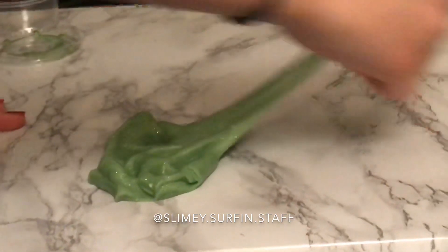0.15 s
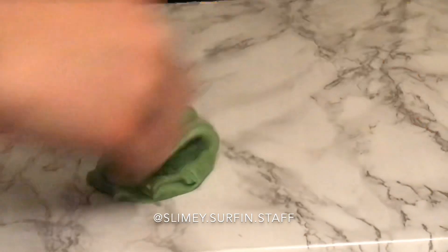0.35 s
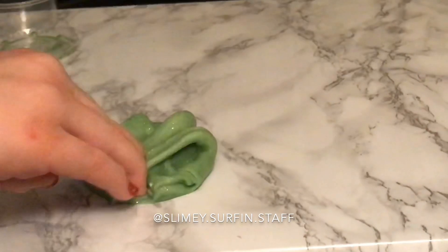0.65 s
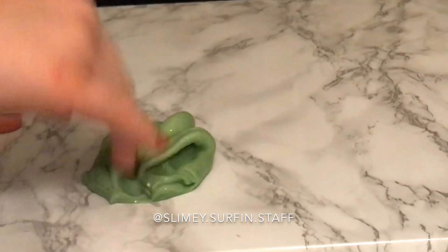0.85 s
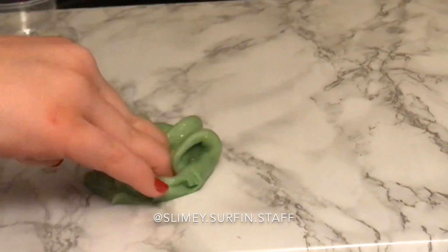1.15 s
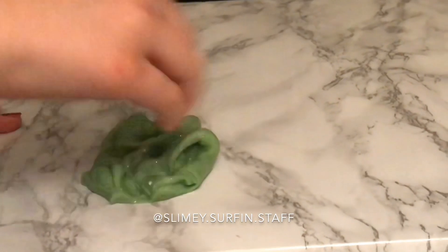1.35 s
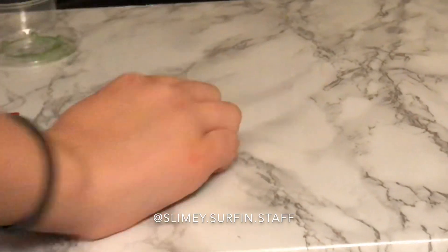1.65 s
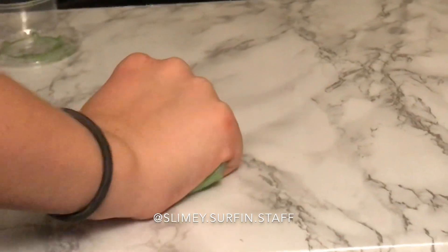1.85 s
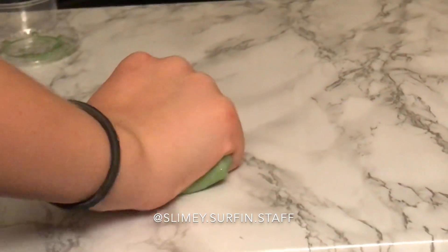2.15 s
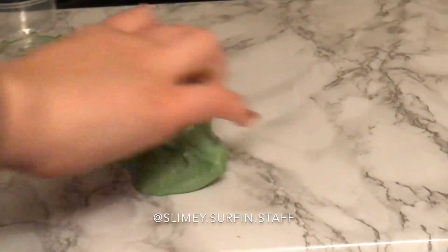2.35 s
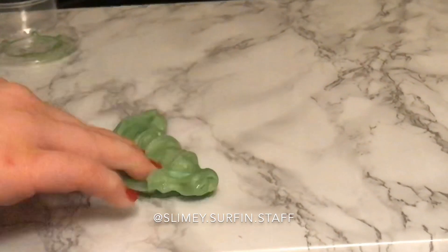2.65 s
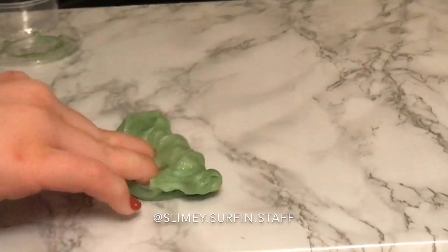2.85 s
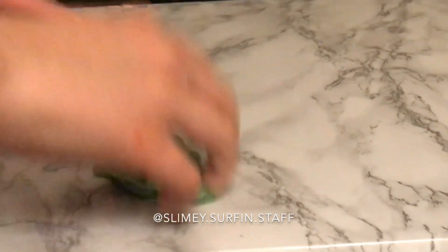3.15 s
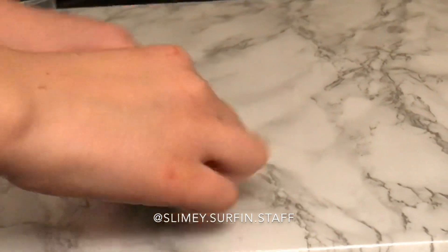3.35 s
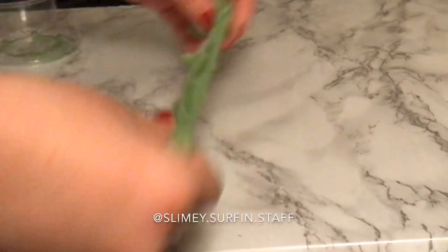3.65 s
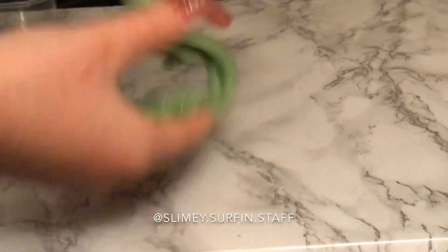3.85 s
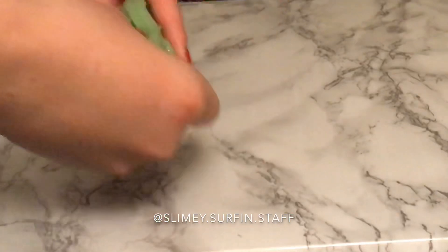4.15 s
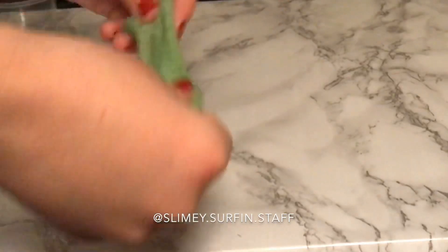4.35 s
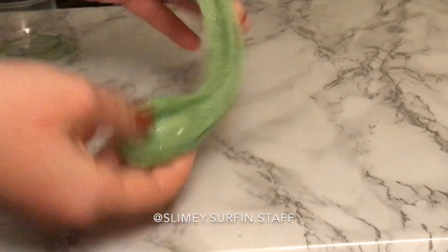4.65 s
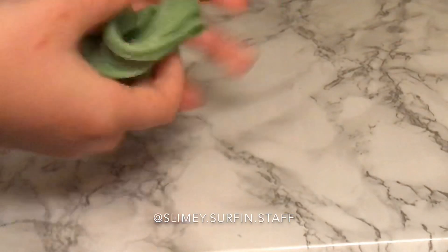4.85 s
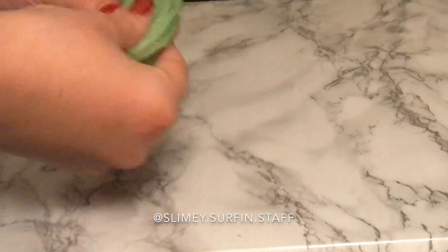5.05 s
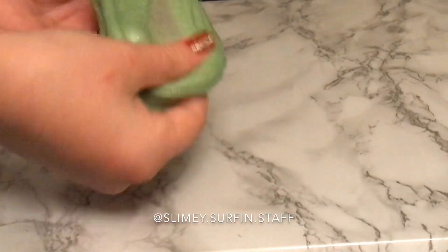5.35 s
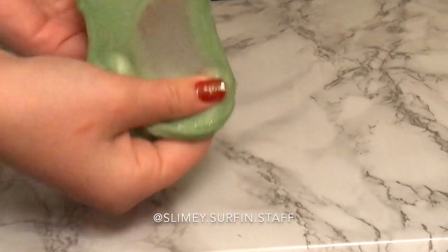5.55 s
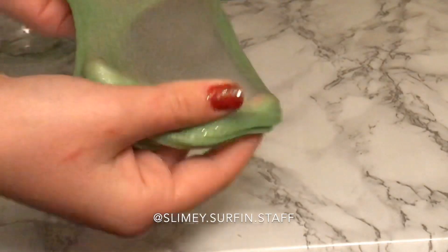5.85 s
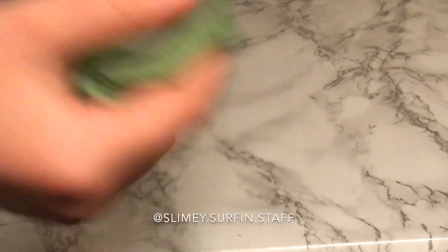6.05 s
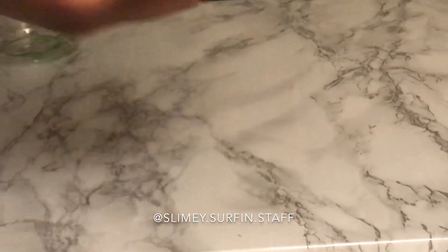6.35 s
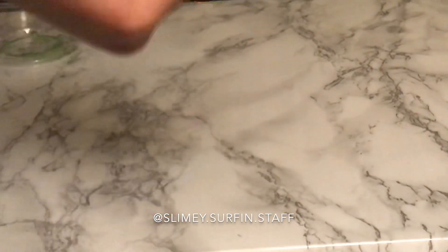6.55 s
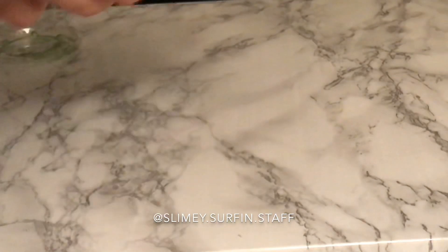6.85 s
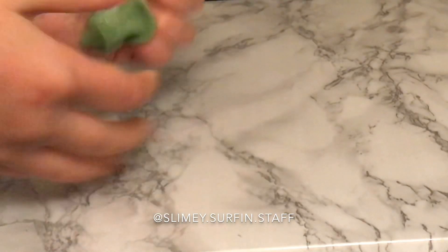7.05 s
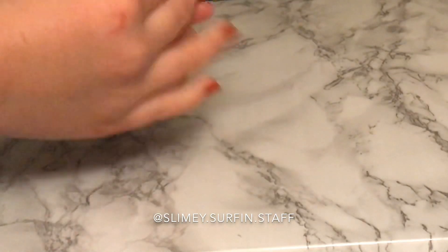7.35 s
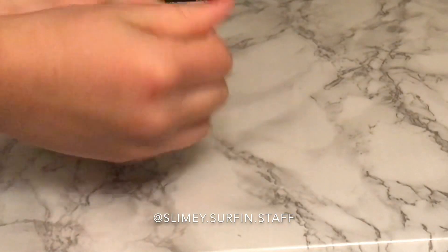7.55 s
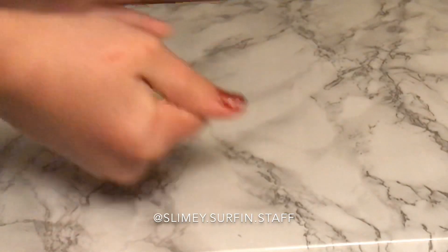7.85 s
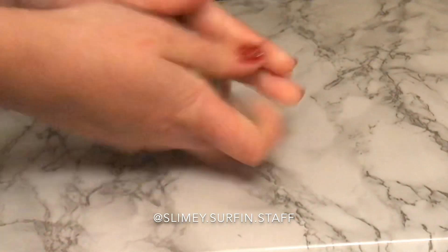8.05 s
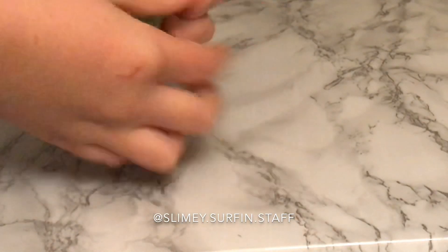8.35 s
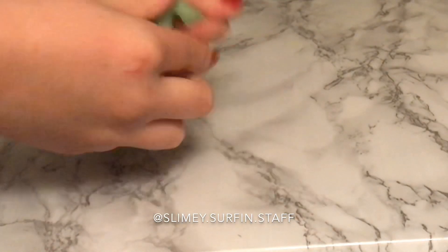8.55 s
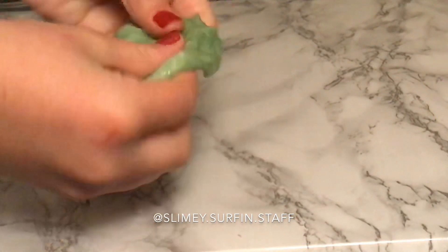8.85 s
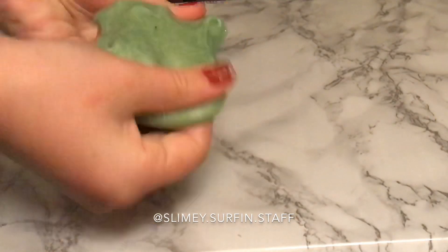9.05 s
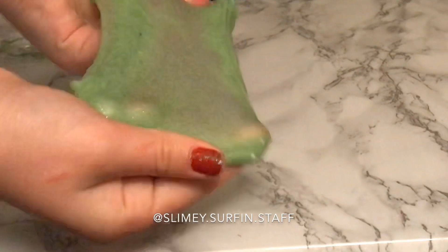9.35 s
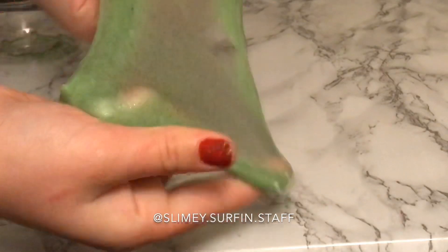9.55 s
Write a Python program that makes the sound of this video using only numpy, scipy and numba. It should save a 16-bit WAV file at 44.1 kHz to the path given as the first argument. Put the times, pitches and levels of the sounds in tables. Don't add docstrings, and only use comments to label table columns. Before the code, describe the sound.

A close microphone in a small quiet room, with faint building rumble and soft hiss throughout. Hands work sticky slime on a stone counter. The first second is nearly quiet, with small sticky ticks and a plop around 0.7-0.9 s. A crisp loud pop snaps at 1.4 s, then irregular crackles, tiny pops and soft thuds run from 1.6 to 2.4 s, ending in a wet gurgle. After a pause, snaps resume at 3.1 s; a firm knuckle press thuds at 3.3 s amid squelchy crackle until 3.5 s. Sparse stretching follows, with single pops at 4.2 and 5.4 s. Fine bright snaps gather at 6.4 and 6.85 s. The loudest sharp pops burst around 7.2-7.3 s, followed by scattered crackling to 8 s, a dull thud at 8.2 s, hollow plops and a tiny squeak near 8.5 s, ticks to 8.8 s, then near quiet.

```python
import sys
import numpy as np
from scipy import signal
from scipy.fft import rfft, irfft, next_fast_len
from scipy.io import wavfile
from scipy.ndimage import uniform_filter1d
from numba import njit

SR = 44100
rng = np.random.default_rng(int(sys.argv[2]) if len(sys.argv) > 2 else 0)


def nominal_scale(level):
    x = np.asarray(level, float) / 20
    return 10 ** x


def log_audio(samples):
    frames = np.atleast_2d(samples).T
    limited = np.clip(frames, -1, 1)
    pcm = np.round(limited * 32767).astype(np.int16)
    wavfile.write(sys.argv[1], SR, pcm)


N = 427329

# (frequency [Hz], level per Hz [dB])
CRACKLE_COLOUR = [(1500, -21), (2800, -3), (4500, 0), (6200, -0.5), (10400, -0.5), (12500, 4), (15900, 2.5)]
HOLLOW_HZ = 1600


def pops():
    bounce_s, bounce_db = 0.00016, -17.5
    out, t = np.zeros(N), np.arange(400) / SR
    bursts = pockets()
    chance = rng.random((len(bursts), 4))
    shape = (len(bursts), len(t))
    tears = rng.standard_normal(shape) * nominal_scale(4.43 * rng.standard_normal(shape))
    for (s, db, snap_hz, cavity_db, cavity_hz, tick_db), c, tear in zip(bursts, chance, tears):
        snap = ring(snap_hz, 0.47, 0, t) + 0.25 * ring(snap_hz * (0.65 + 0.13 * c[0]), 0.3, 0, t)
        snap = snap + nominal_scale(bounce_db) * np.roll(snap, round(bounce_s * SR))
        cavity = hollow(0.8 * cavity_hz, t)
        tick = ring(11500 + 1500 * c[1], 0.47, 0, t) - 0.2 * ring(14200 + 1200 * c[2], 0.28, 0, t)
        skin = snap + nominal_scale(tick_db) * tick
        tear = nominal_scale(-22.5) * tear * np.exp(-t * snap_hz / 9.5) * (t > 0.0002)
        torn_skin = np.convolve(skin, tear)[:len(t)]
        add(out, s, nominal_scale(db) * (nominal_scale(cavity_db) * cavity - skin - torn_skin))
    return signal.sosfilt(signal.butter(3, 500, "high", fs=SR, output="sos"), out)


def pockets():
    # (time [s], snap level [dB], snap pitch [Hz], hollow re snap [dB], film tick re snap
    # [dB])
    blisters = [(1.6741, -30, 8000, -28, 2), (1.3666, -14.5, 7970, -19.5, -21),
                (1.6713, -27.5, 9400, -26, 4.5), (1.6888, -35, 5670, -35, 1),
                (1.8576, -25, 6600, -26, 2.5), (1.9884, -37.5, 6000, -13, 1),
                (2.0942, -25, 5760, -21, -5), (2.1149, -32.5, 8950, -34, 4),
                (2.1773, -31.5, 5300, -31, -2), (2.2878, -39, 6050, -22, -10),
                (2.3083, -27.5, 6000, -34, 2.5), (2.3293, -31, 7160, -7.5, -14),
                (3.0906, -38.5, 6440, -23, -4), (3.2905, -32, 4860, -1.5, -12),
                (3.3142, -34, 4410, -30, -7), (3.3591, -30, 4300, -6.5, -17),
                (3.3934, -32, 3700, -20, -19), (3.4332, -28, 8900, -18, -23),
                (3.4931, -36, 7150, -13, 3),
                (4.2274, -20, 6330, -17.5, -1), (5.387, -33, 6840, -7.5, 4.5),
                     (5.3952, -43, 6030, -23, 6), (7.153, -30, 8600, -12.5, -5),
                     (7.1675, -29, 6060, -31, 2.5), (7.202, -32, 8000, -33, 2),
                     (7.2027, -23.5, 5850, -11.5, -2), (7.251, -22.5, 8700, -6.5, 12),
                     (7.2579, -3.5, 7360, -12, -2.5), (7.2937, -26, 8790, -15, -10.5),
                     (7.3039, -9, 5260, -33, 2.5), (7.463, -35, 5170, -10, -14),
                     (7.6298, -30.5, 9600, -25, -6.5), (7.726, -28.5, 7900, -28, -2),
                     (7.729, -32, 6240, -22, 3.5), (7.7531, -29, 7200, -36, 1),
                     (7.8136, -19, 8850, -46, 11), (8.4937, -29, 8090, -30, 0),
                     (8.5608, -27.5, 7300, -17, 1)]
    # (time
    # [s], snap level [dB], hollow pitch [Hz], hollow re snap [dB], tick re snap [dB])
    finger_holes = [(0.9296, -33.5, 1400, 7, 5.5), (1.1436, -49, 1320, 3, -16),
                    (1.2187, -47.5, 1960, -4, -10), (1.8255, -44, 1620, -5, -2),
                    (1.9032, -47.5, 1600, 9.5, -17), (1.9806, -42, 1540, -1.5, -2),
                    (2.0948, -45, 765, 2, -5), (2.3004, -37, 2200, -17, 3), (3.3166, -41.5, 2150, -3, -14),
                    (3.345, -50, 2330, 0, -13), (3.6455, -51.5, 2130, -5.5, -11),
                    (5.175, -64, 1040, 10, -5), (5.2708, -59, 1980, 15, 7), (5.7332, -49, 2230, -4, -1),
                    (6.8229, -53, 2070, 7, 13), (6.859, -41, 1870, -5, 11), (6.9057, -35.5, 2270, -8, -3),
                    (6.9796, -52, 2430, 3, 14), (7.105, -39, 1200, -3, -10.5),
                    (7.607, -26, 1700, -17.5, -8), (8.399, -45, 1900, -12, -8),
                    (8.433, -25.5, 1720, -7, -16), (8.471, -25, 1967, -1, 3), (9.3206, -47, 1820, -3.5, 7),
                    (2.0778, -45, 1500, -9, 1), (2.3081, -47, 915, 10.5, -10), (4.2263, -47, 1000, 4, -8),
                    (4.446, -68, 2090, 11, -10), (3.434, -54, 1190, 7, -12), (7.2582, -31, 820, 1, -10),
                    (1.912, -53, 1800, 6, -10), (8.4323, -50, 935, 4, -10), (8.4716, -44.5, 900, 4.5, -10),
                    (8.561, -53.5, 960, 6, -10), (5.3874, -52.5, 960, 2.5, -10)]
    # (time [s],
    # level [dB], snap pitch [Hz])
    small_bubbles = [(0.732, -44.5, 4200), (1.926, -44, 5170), (2.6863, -42.5, 9050), (3.0854, -44, 5680),
                     (3.3738, -44, 4600), (3.4212, -39, 4560), (3.4816, -41, 4150), (3.7877, -49.5, 4440),
                     (6.364, -43.5, 4670), (6.403, -35.5, 3770), (6.623, -40.5, 8500), (6.8674, -47, 5840),
                     (7.015, -44, 4900), (7.133, -39, 4400), (7.482, -46, 5260), (7.7393, -51, 6350),
                     (7.8544, -51, 8250), (7.8966, -38, 5880), (7.941, -48.5, 7280), (7.9537, -50, 6160),
                     (7.96, -52, 6350), (8.537, -46, 8790), (8.552, -43, 6960), (8.6782, -59, 5750),
                     (8.748, -35, 5820), (8.7845, -45, 5900), (8.8043, -44, 8790), (8.8257, -45, 5600),
                     (9.123, -49, 4500), (1.8915, -40, 6500), (1.923, -41, 5240), (1.71, -47, 5600),
                     (3.441, -36, 7460), (4.338, -47, 6650), (8.791, -42, 6000), (8.569, -41, 6200),
                     (0.9345, -36, 7400), (6.8706, -39, 4800), (6.834, -47, 5520), (7.1605, -50, 7000),
                     (1.3667, -25.5, 4000), (9.014, -57, 2300), (9.171, -59, 2400), (9.226, -58.5, 2600),
                     (3.898, -57, 1900), (3.932, -60, 1600), (3.813, -53, 4700)]
    # (time [s], tick level [dB], snap re tick [dB])
    thin_threads = [(0.907, -39, -8), (6.727, -53, -13), (1.6285, -53, -8), (1.8294, -32, -8),
                    (2.056, -35, -8.5), (2.0735, -40, -16), (2.1082, -34, -30), (2.128, -29.5, -12),
                    (2.1474, -35, -23), (2.1863, -34.5, -20), (3.046, -41, -9), (3.6059, -49, -9),
                    (3.19, -58, -6), (3.932, -46.5, -4.5), (4.012, -59, -1), (1.074, -60, 8),
                    (4.3246, -38, -13), (4.5124, -47, -11), (5.7104, -43.5, -7), (6.7085, -35.5, -7.5),
                    (7.225, -22.5, -22.5), (7.863, -31.5, -10), (7.9386, -33, -15), (7.949, -51, -8),
                    (8.047, -47, -8), (8.522, -39, -5), (8.6566, -41.5, -8), (8.7633, -42, -10),
                    (0.924, -42, -10), (0.9567, -57, -8), (1.6822, -34, -12), (1.707, -40, -6),
                    (1.8373, -44, -15), (2.0865, -39, -15), (2.1008, -31, -7), (4.333, -47, -6),
                    (5.4011, -48, -10), (6.6186, -50, -7), (7.238, -35, -11.5), (7.2676, -13, -6),
                    (7.3903, -50, -10), (7.5339, -51, -10), (7.568, -43, -14), (7.7339, -35, -13),
                    (7.7394, -36, -16), (7.7481, -41, -14), (7.7667, -36, -9), (7.955, -45, -10),
                    (7.9719, -49, -10), (8.1254, -41, -2), (8.5469, -42, -10), (8.6779, -52, -10),
                    (8.7389, -37, -16)]
    # (time [s], level [dB])
    finest_threads = [
        (6.6479, -46),
        (6.8581, -25),
        (6.8676, -35),
        (6.8834, -37),
        (7.2817, -24.5),
        (6.682, -48),
        (6.2, -42),
        (7.2595, -17),
        (6.832, -34),
    ]

    rows = []
    for s, db, hz, hollow_db, tick_db in blisters:
        hollow_hz = HOLLOW_HZ * 2 ** (-0.024 * (db + 30))
        rows.append((s, db, hz, hollow_db, hollow_hz, tick_db))
    for s, db, hz, hollow_db, tick_db in finger_holes:
        rows.append((s, db, 2.4 * hz, hollow_db, hz, tick_db))
    for s, db, hz in small_bubbles:
        rows.append((s, db, hz, -20.5, HOLLOW_HZ, -3))
    for s, db in finest_threads:
        rows.append((s, db, 15100, -40, HOLLOW_HZ, -13))
    for s, db, snap_db in thin_threads:
        rows.append((s, db + snap_db, 6240, -14, HOLLOW_HZ, -snap_db))
    return rows


def ring(hz, cycles, phase, t):
    u = t * hz / cycles
    shape = u ** 1.64 * np.exp(-u) * np.sin(2 * np.pi * hz * t + phase)
    return shape / np.abs(shape).max()


def hollow(hz, t):
    cycles, sag = 0.5, 0.8
    u = t * hz / cycles
    turns = hz * t + sag * cycles * (1 - np.exp(-u))
    shape = u * np.exp(-u) * np.sin(2 * np.pi * turns)
    return shape / np.abs(shape).max()


def peel():
    # (peak
    # [s], crackle level [dB], wet squelch re crackle [dB], rise [s], fall [s])
    peels = [(0.02, -69.5, -22, 0.063, 0.26), (0.739, -64.5, 1.5, 0.03, 0.01),
             (0.908, -62, -1, .012, 0.016), (0.933, -53, 6.5, 0.01, 0.034),
             (1.372, -48.5, -1, 0.0062, 0.053), (1.679, -59, -2, 0.069, 0.036),
             (1.74, -60.5, -4.5, 0.1, 0.33), (1.909, -66, -10, 0.1, 0.089),
             (1.994, -61, -21, 0.039, 0.11), (2.102, -64, -15, 0.06, 0.11),
             (2.189, -51.5, -24, 0.018, 0.034), (2.31, -44.5, -9.5, 0.038, 0.052),
             (2.356, -53.5, -8, 0.073, 0.09), (3.055, -63, 1.5, 0.014, 0.066),
             (3.097, -55.5, -5.5, 0.026, 0.028), (3.296, -68, 12, 0.0099, 0.098),
             (3.367, -55.5, 3.5, 0.052, 0.064), (3.48, -62, -1, 0.24, 0.14),
             (3.6, -87, 9.5, 0.12, 0.94), (1.13, -68, 2, 0.026, 0.041),
             (3.8, -70.5, 0, 0.11, .07), (4.33, -69.5, -25, .004, 0.12), (4.7, -59.5, -7, 0.043, .03),
                  (4.655, -70, -3, 0.064, .03), (4.25, -58.5, -23, 0.032, 0.041),
                  (4.717, -58.5, -10, 0.023, 0.024), (4.785, -71, 0, 0.037, 0.052),
                  (5.396, -59.5, -11, 0.0048, 0.06), (6.03, -68, -7, 0.13, 0.053),
                  (6.1, -76.5, 5.5, 0.24, 0.41), (6.404, -64, -1, 0.11, 0.15), (6.83, -59, -8, 0.07, .06),
                  (6.866, -51.5, -4, 0.061, 0.069), (7.02, -66, -8, 0.32, 0.18),
                  (7.114, -63.5, 1, .02, 0.054), (7.206, -52.5, 1, 0.0091, 0.036),
                  (7.262, -43.5, -2.5, 0.014, 0.035), (7.295, -62.5, -3.5, .03, 0.31),
                  (7.42, -70, -13, .08, 0.072), (7.474, -53, -1, 0.069, 0.15),
                  (7.615, -59.5, -2, 0.058, 0.12), (7.95, -63.5, -7, 0.67, 0.97),
                  (8.13, -53, -6.5, 0.057, 0.051), (8.165, -51, -4.5, 0.056, 0.058),
                  (8.35, -75.5, 6, 0.73, 0.2), (8.482, -55.5, -7, 0.043, 0.054),
                  (8.567, -72, 1, 0.06, 0.21), (8.7, -57.5, -3.5, 0.043, 0.077),
                  (8.759, -60.5, -6, 0.13, 0.11)]
    # (frequency [Hz], level per Hz [dB])
    squelch_colour = [(350, -16), (600, -1), (900, -3), (1400, -6), (1900, -4), (2600, -5), (4000, -11.5)]
    roundness, squelch_lingers = 1.11, 1.04

    power, t = np.zeros((2, N)), np.arange(N) / SR
    for s, db, wet_db, rise, fall in peels:
        i = slice(max(int((s - 3 * rise) * SR), 0), int((s + 3 * fall) * SR))
        for layer, level, f in [(0, db, fall), (1, db + wet_db, fall * squelch_lingers)]:
            away = np.maximum((s - t[i]) / rise, (t[i] - s) / f) ** roundness
            power[layer, i] += nominal_scale(level - 20 * away) ** 2
    bright_gain, wet_gain = np.sqrt(power)
    bright = unit(colour(snaps(5000, 2.8, 7040, 0.98, 3.1), CRACKLE_COLOUR)) * nominal_scale(2 * walk(45))
    wet = unit(colour(snaps(1200, 2.4, 1800, 0.555, 2.6), squelch_colour)) * nominal_scale(2 * walk(45))
    return bright_gain * bright + wet_gain * wet


def strays():
    return nominal_scale(-52.5) * colour(snaps(6, 2.8, 9000, 0.28, 0.7), CRACKLE_COLOUR)


def snaps(rate, spread_db, centre_hz, octaves, cycles):
    breaks = rng.random(N) < rate / SR
    sizes = breaks * nominal_scale(spread_db * np.minimum(rng.exponential(size=N), 3))
    hz = centre_hz * 2 ** (octaves * rng.standard_normal(N) + 0.07 * walk(14))
    return grains(sizes, np.clip(hz, 300, 16000), 1.0 * cycles)


@njit
def grains(sizes, hz, cycles):
    out = np.zeros(len(sizes) + 2000)
    for i in range(len(sizes)):
        if sizes[i] != 0:
            z = sizes[i] + 0j
            p = np.exp((2j * np.pi - 1 / cycles) * hz[i] / SR)
            for k in range(min(int(5 * cycles * SR / hz[i]), 2000)):
                out[i + k] += z.imag
                z *= p
    return out[:len(sizes)]


def thuds():
    # (time [s], level [dB], spot pitch [Hz])
    pushes = [(0.925, -48, 350), (1.366, -40.5, 350), (1.606, -44, 250), (1.752, -35, 394),
              (1.765, -37, 330), (2.093, -38.5, 550), (2.309, -44, 600), (3.289, -26, 410),
              (3.304, -30, 330), (3.316, -34, 300), (3.33, -36.5, 200), (3.344, -39, 300.4),
              (3.359, -32, 223), (3.374, -36.5, 230), (3.394, -45, 200), (3.414, -43.5, 160),
              (7.257, -36.5, 380), (8.189, -34, 329), (8.205, -36.5, 260), (8.217, -35.5, 199),
              (8.232, -42.5, 281)]
    # (frequency [Hz], level [dB], time to fall 60 dB [s])
    modes = [(152, -5, 0.12), (191.5, 1, 0.098), (259, 0.5, 0.051), (311, -1.5, 0.12), (365, 3, 0.055),
             (520, -2.5, 0.022), (672, 2.5, 0.034)]
    out, t = np.zeros(N), np.arange(6000) / SR
    chance = rng.standard_normal((len(pushes), 2, len(modes)))
    for (s, db, spot_hz), (spot, tune) in zip(pushes, chance):
        body = np.zeros(len(t))
        for (hz, mode_db, t60), a, b in zip(modes, spot, tune):
            level = mode_db + 2.5 * a - 7.5 * abs(np.log2(hz / spot_hz))
            tone = np.sin(2 * np.pi * hz * (1 + 0.038 * b) * t)
            body += nominal_scale(level) * tone * np.exp(-np.log(1000) * t / t60)
        soft_onset = 1 - np.exp(-t / 0.002)
        add(out, s, nominal_scale(db) * soft_onset * body / np.abs(body).max())
    return out


def gurgles():
    # (middle [s], pitch [Hz], level [dB], length [s])
    channels = [(2.198, 3460, -61, 0.035), (2.31, 3140, -52, 0.013), (2.311, 4520, -53, 0.033),
                (2.312, 2660, -54, 0.02), (2.326, 1796, -52, 0.03), (2.327, 5990, -58, 0.038),
                (2.332, 3570, -62, 0.011), (2.347, 3360, -54, 0.024), (2.346, 4580, -56, 0.015),
                (2.349, 1787, -48, 0.015), (2.365, 3940, -70, 0.031), (2.407, 1870, -67, 0.014),
                (3.319, 2420, -52, 0.011), (3.362, 2575, -49, 0.013), (3.375, 4530, -52, 0.012),
                (3.394, 3900, -53, 0.011), (3.394, 5250, -54, 0.016), (3.395, 1400, -55, 0.012),
                (3.422, 3240, -55, 0.016), (3.425, 4540, -55, 0.016), (4.7, 1625, -60, 0.02),
                (4.698, 5430, -65, 0.012), (4.715, 6460, -63, 0.012), (4.718, 5770, -67, 0.018),
                (4.719, 4660, -64, 0.013), (6.37, 4540, -62, 0.022), (6.836, 2050, -55, 0.014),
                (6.86, 4600, -67, 0.024), (6.869, 5810, -59, 0.015), (6.871, 4670, -53, 0.012),
                (6.874, 1820, -55, 0.016), (6.899, 2000, -58, 0.014), (6.906, 3140, -55, 0.012),
                (7.463, 2410, -53, 0.0099), (7.487, 2290, -52, 0.009), (7.476, 2300, -53, .009),
                (7.506, 1290, -54.5, 0.016), (7.511, 2200, -53, 0.012), (7.533, 1376, -52, 0.017),
                (8.126, 2810, -53, 0.012), (8.162, 1820, -56, 0.017), (8.18, 1340, -57, 0.02),
                (8.748, 6150, -60, 0.015), (8.792, 6030, -58, 0.013)]
    rough, glide = 0.87, 0.063
    out, u = np.zeros(N), np.linspace(0, 1, num=24)
    chance = rng.standard_normal((len(channels), len(u)))
    for (s, hz, db, length), c in zip(channels, chance):
        t = np.arange(int(1.25 * length * SR)) / SR
        v = t / t[-1]
        pitch = hz * (1 + glide * c[0] * (v - 0.5))
        swell = np.sin(np.pi * v) ** 2 * (1 + rough * np.interp(v, u, c))
        add(out, s - t[-1] / 2, nominal_scale(db) * swell * np.sin(2 * np.pi * np.cumsum(pitch) / SR))
    return out


def squeaks():
    # (start [s], end [s], start pitch [Hz], end pitch [Hz], level [dB])
    slips = [
        (3.159, 3.301, 980, 820, -72),
        (3.868, 4.181, 2580, 3150, -75.5),
        (4.35, 4.52, 2900, 3450, -73.5),
        (4.34, 4.42, 2650, 2620, -75),
        (2.35, 2.43, 1750, 2000, -60),
        (8.683, 8.728, 4480, 4520, -65),
        (8.693, 8.712, 4250, 3500, -65),
        (8.473, 8.497, 2330, 2300, -56),
    ]
    out, t = np.zeros(N), np.arange(N) / SR
    wobble = unit(uniform_filter1d(rng.standard_normal(N), size=100))
    for start, end, start_hz, end_hz, db in slips:
        u = np.clip((t - start) / (end - start), 0, 1)
        line = np.sin(2 * np.pi * np.cumsum(start_hz + (end_hz - start_hz) * u) / SR)
        out += nominal_scale(db) * stroke(u) * wobble * line
    return out


def rub():
    # (start [s], end [s], low edge [Hz], high edge [Hz], level [dB])
    rolls = [
        (7.3, 8.1, 230, 390, -70.5),
        (3.285, 3.43, 330, 990, -57.5),
        (7.3, 8.85, 550, 1000, -73.5),
        (1.745, 1.79, 330, 650, -63.5),
        (6.2, 10, 230, 354, -73),
    ]
    out, noise, waver = 0, rng.standard_normal(N), 2 * walk(45)
    for start, end, low_hz, high_hz, db in rolls:
        u = np.clip((np.arange(N) / SR - start) / (end - start), 0, 1)
        band_pass = signal.butter(2, [low_hz, high_hz], "band", fs=SR, output="sos")
        band = signal.sosfilt(band_pass, noise)
        out = out + nominal_scale(db + waver) * stroke(u) * unit(band)
    return out


def stroke(u):
    return np.sqrt(np.abs(np.sin(np.pi * u))) * (u > 0) * (u < 1)


def soften_treble(x):
    # (start [s], end [s])
    dull_moments = [
        (1.35, 1.46),
        (4.21, 4.315),
        (5.37, 5.45),
    ]
    t = np.arange(N) / SR
    dulled = sum((t > start) & (t < end) for start, end in dull_moments)
    dull = signal.sosfiltfilt(signal.butter(4, 13400, fs=SR, output="sos"), x)
    return x + uniform_filter1d(1.0 * dulled, size=400) * (dull - x)


def room(x):
    # (delay [s], level [dB], smear [s])
    surfaces = [(.0012, -23, .0003), (.0022, -21, .0003), (.0040, -29, .0005), (.0086, -20, .0007),
                (.0123, -29, .0005), (.0146, -26, .0005), (.0177, -26, .0005)]
    # (band centre [Hz], time to fall 60 dB [s], level [dB])
    tail_bands = [(646, 0.19, -29), (1400, 0.25, -35), (2810, 0.15, -30.5), (5600, 0.17, -31.5),
                  (11450, 0.17, -31)]
    t = np.arange(SR // 2) / SR
    response = np.zeros(len(t))
    for delay, db, smear in surfaces:
        blur = np.exp(-((t - delay) / smear) ** 2) / np.sqrt(smear * SR)
        response += nominal_scale(db) * blur * rng.standard_normal(len(t))
    response = colour(response, [(200, 3.0), (8000, 2.6), (14000, 3.0), (21000, 0.5)])
    fill = 1 - np.exp(-t / 0.012)
    for hz, t60, db in tail_bands:
        octave = [(hz / 1.8, -24), (hz / 1.35, 0), (hz * 1.35, 0), (hz * 1.8, -24)]
        band = unit(colour(rng.standard_normal(len(t)), octave))
        decay = np.exp(-np.log(1000) * t / t60)
        response += nominal_scale(db - 12.5) * np.sqrt(hz / 5600) * band * fill * decay
    response = signal.sosfilt(signal.ellip(6, 0.2, 50, 15900, fs=SR, output="sos"), response)
    response[0] = 1
    return signal.fftconvolve(x, response)[:N]


def room_tone():
    # (frequency [Hz], level per Hz [dB])
    tone_colour = [(22, -35), (35, -10.5), (47, -2.5), (60, 5), (78, -5), (112, 0.5), (140, -8.5),
                   (182, -17), (378, -22.5), (600, -29), (1300, -31), (4600, -36.5), (10000, -42),
                   (15900, -38)]
    tone = colour(rng.standard_normal(N), tone_colour)
    rumble = signal.sosfilt(signal.butter(2, 400, fs=SR, output="sos"), tone)
    hiss = signal.sosfilt(signal.butter(2, 400, "high", fs=SR, output="sos"), tone)
    swell = 0.5 * walk(1.5) + 0.16 * (np.arange(N) - N / 2) / SR
    flicker = 0.3 * walk(2.4) + 0.5 * walk(11)
    return nominal_scale(-57.5) * unit(rumble * nominal_scale(swell) - hiss * nominal_scale(flicker))


def colour(x, spectrum):
    hz, db = np.transpose(spectrum)
    size = next_fast_len(x.shape[-1])
    f = np.arange(size // 2 + 1) * SR / size + 1
    gain = nominal_scale(np.interp(np.log(f), np.log(hz), db, left=-70, right=-70))
    return irfft(rfft(x, size) * gain, size)[..., :x.shape[-1]]


def unit(x):
    return x / np.sqrt(np.mean(x ** 2))


def walk(rate):
    k = int(SR / rate)
    steps = rng.standard_normal(size=1000)[np.arange(N) // k]
    return 1.8 * uniform_filter1d(uniform_filter1d(steps, k), k)


def add(out, s, x):
    i = int(s * SR)
    out[i:i + len(x)] += x[:N - i]


def scene():
    slime = pops() + peel() + squeaks() + gurgles() + strays()
    mix = room(soften_treble(slime)) + thuds() + room_tone() + rub()
    return mix[None]


def band_limit(x):
    return signal.sosfilt(signal.butter(12, 17150, fs=SR, output="sos"), x)


def record(dry):
    # (frequency [Hz], level [dB])
    port = [(15, -1.5), (5000, -1), (6200, 0.5), (7700, -1.5), (8900, 3), (10400, -2), (11900, 1.5),
            (15300, 1), (16400, -3.5), (17100, -31.5)]
    return band_limit(colour(dry, port))


dry = scene()
out = record(dry)
log_audio(out)
```